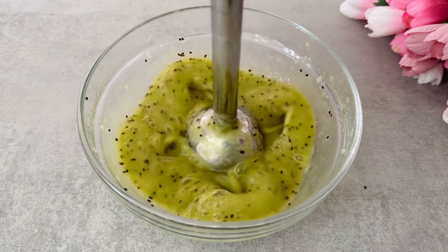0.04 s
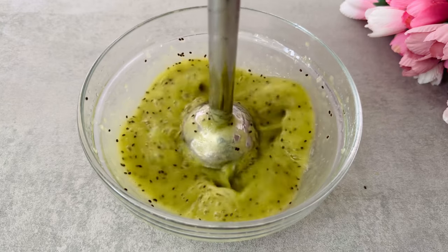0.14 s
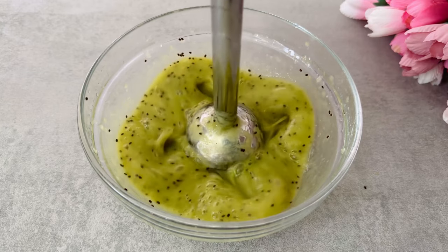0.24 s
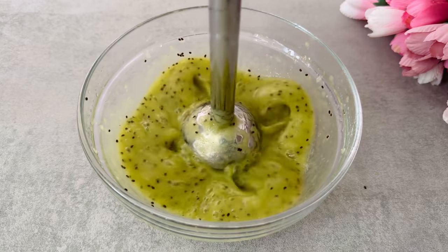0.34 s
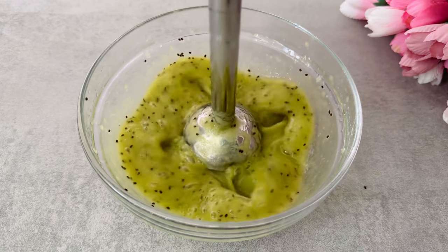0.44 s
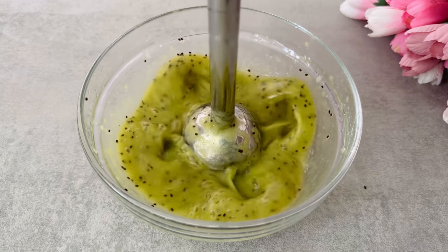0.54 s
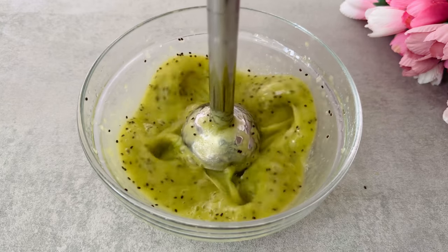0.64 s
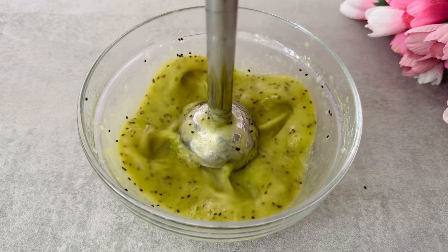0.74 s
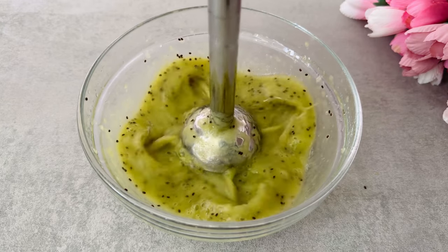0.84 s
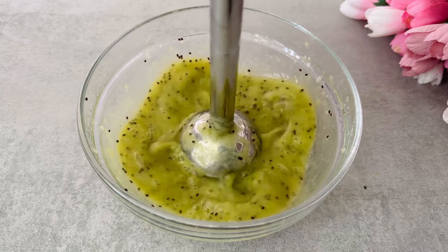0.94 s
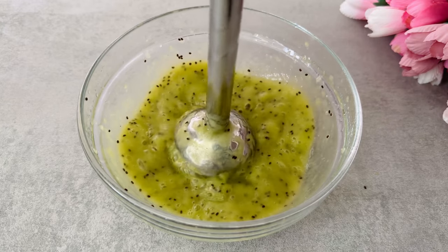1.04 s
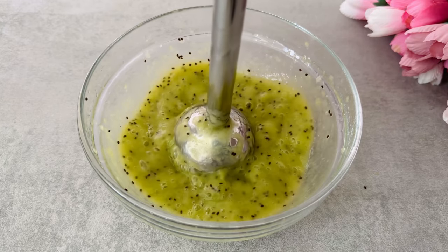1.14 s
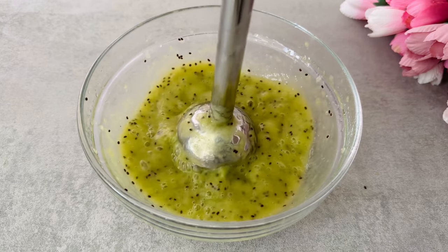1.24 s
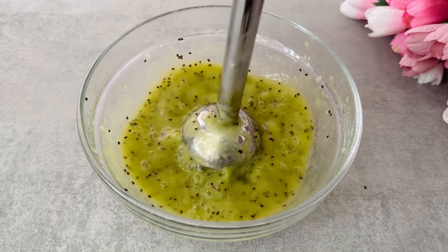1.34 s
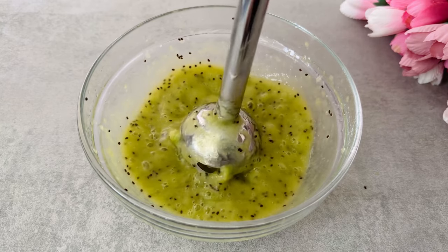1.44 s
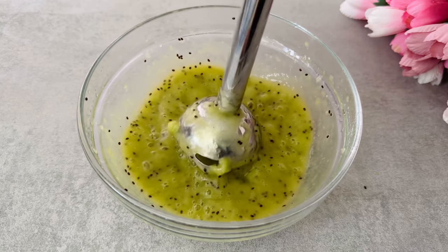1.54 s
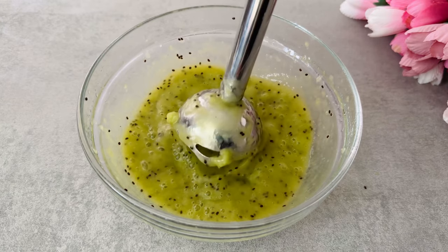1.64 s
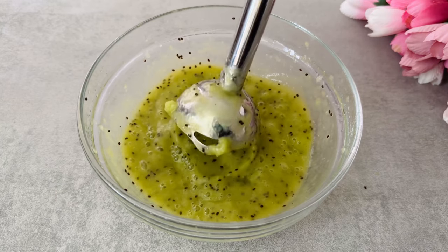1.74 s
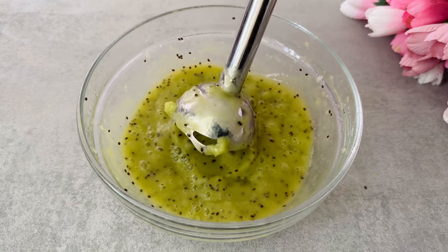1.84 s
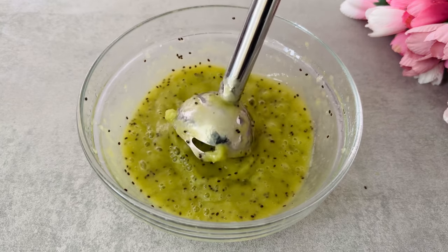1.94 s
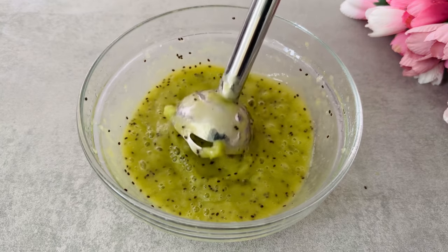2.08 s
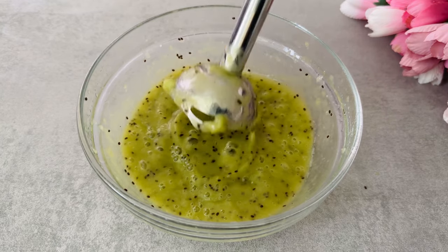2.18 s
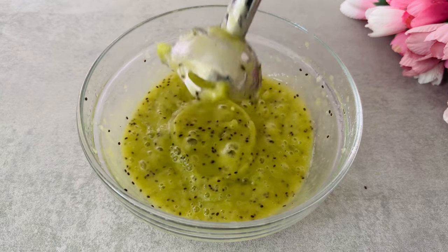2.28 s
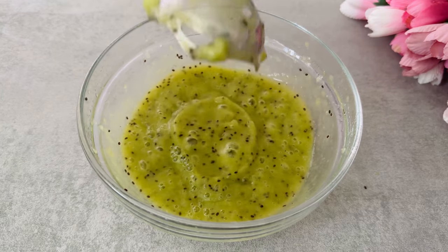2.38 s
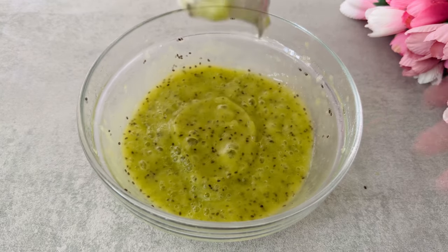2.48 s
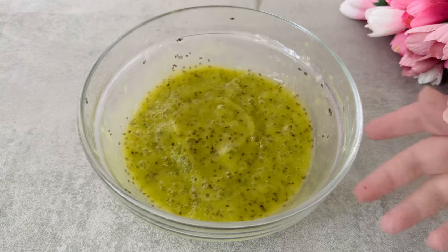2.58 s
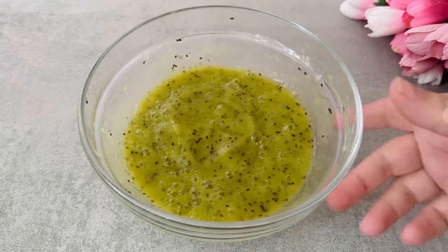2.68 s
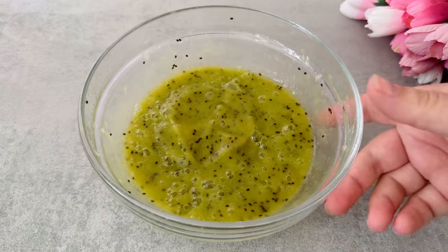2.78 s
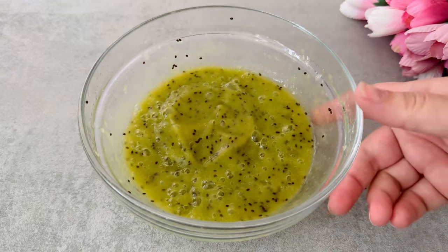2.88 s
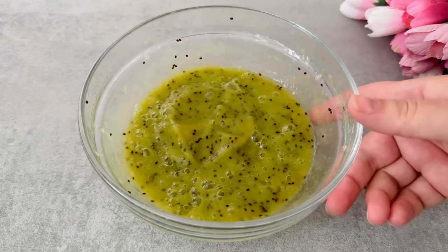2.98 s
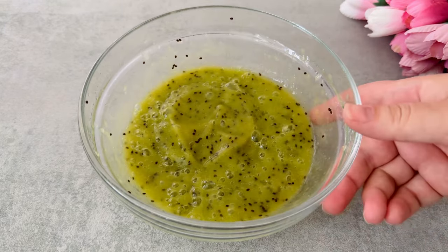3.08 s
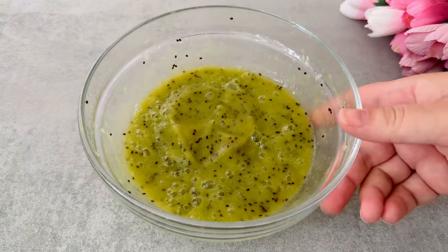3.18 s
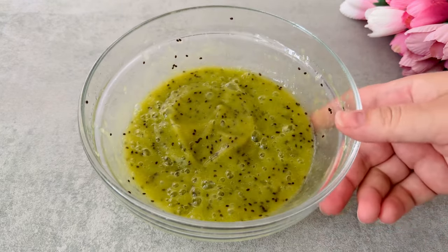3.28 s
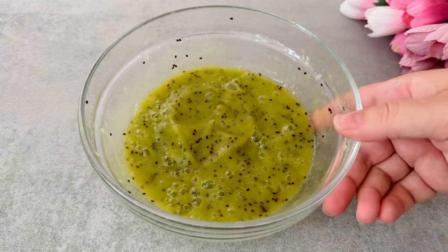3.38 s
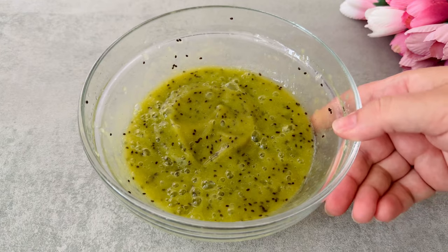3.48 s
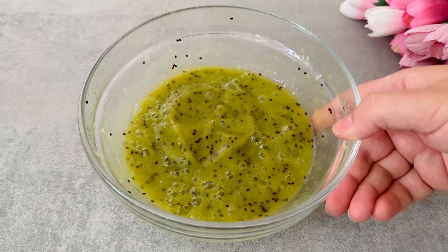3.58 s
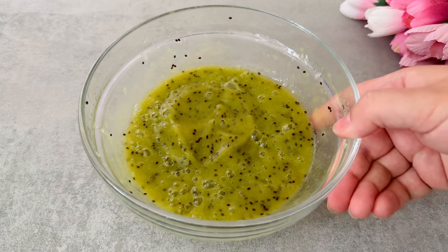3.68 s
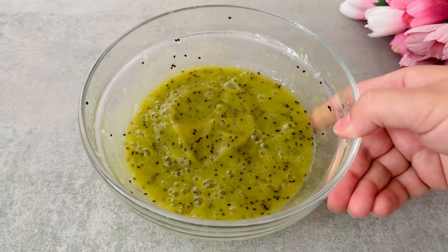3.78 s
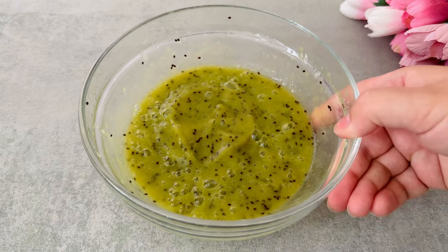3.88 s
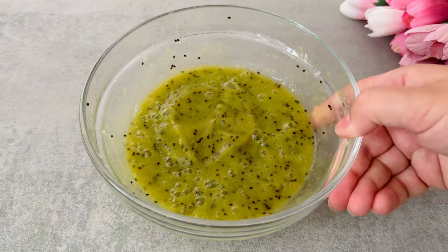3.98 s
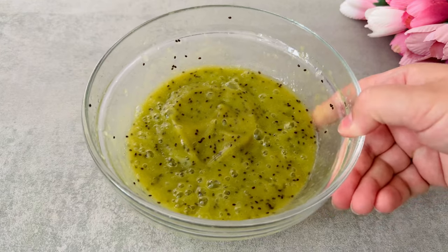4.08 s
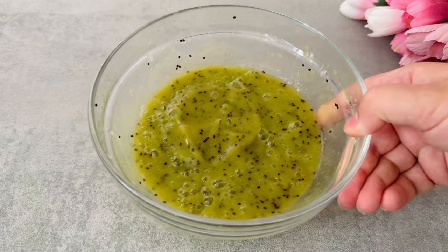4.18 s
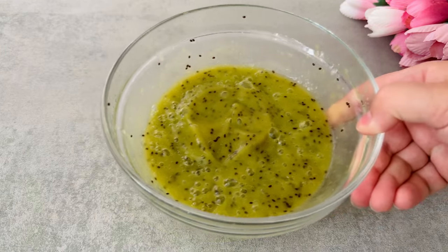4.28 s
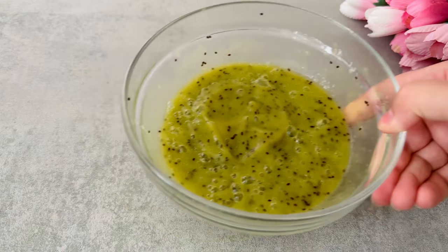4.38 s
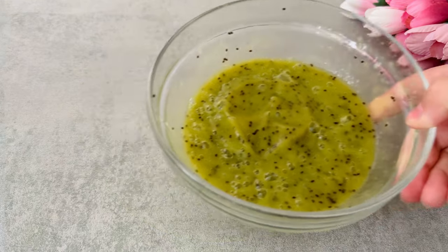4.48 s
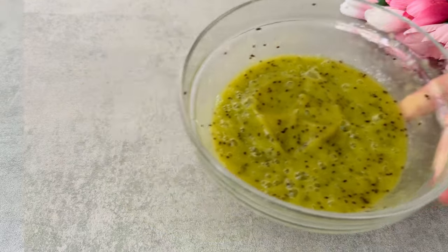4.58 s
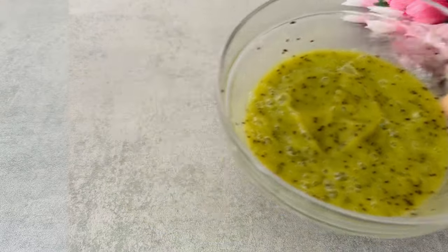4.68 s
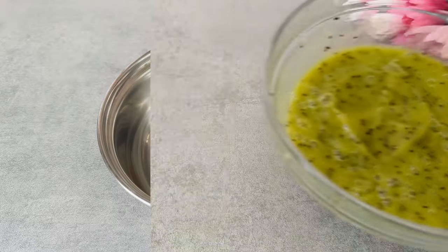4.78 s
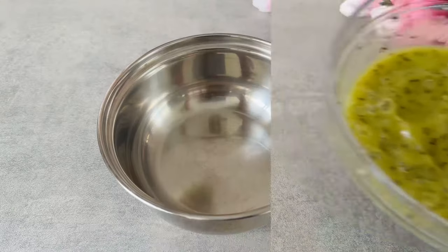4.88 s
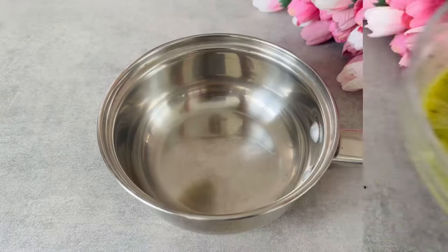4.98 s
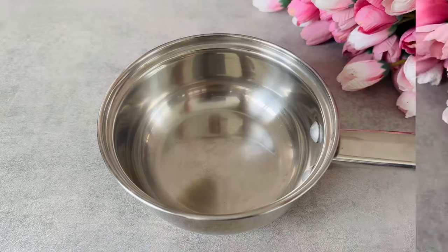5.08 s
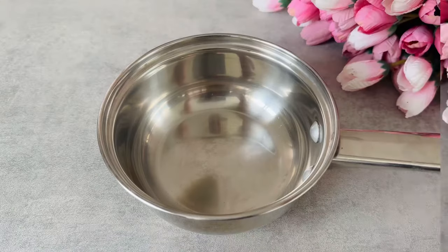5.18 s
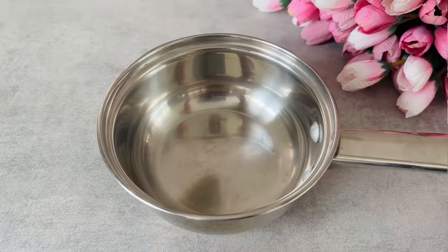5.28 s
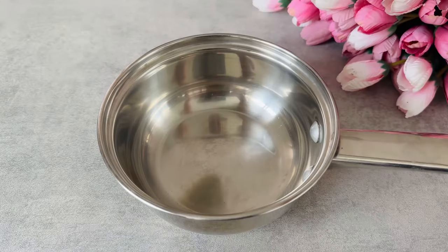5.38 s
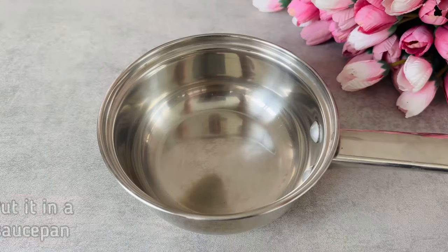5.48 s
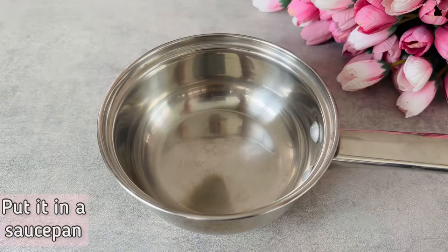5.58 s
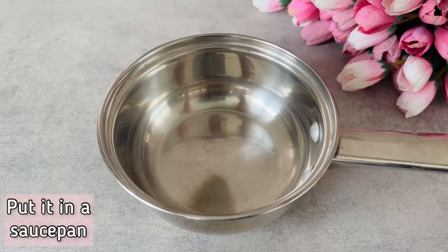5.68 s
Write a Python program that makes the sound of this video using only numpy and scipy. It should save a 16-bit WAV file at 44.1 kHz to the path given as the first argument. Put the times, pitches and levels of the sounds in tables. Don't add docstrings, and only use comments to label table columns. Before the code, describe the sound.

Close and central, a hand blender churns thick fruit pulp in a glass bowl with hollow gulps, wet spits and glassy spray. Just before one second its whine slides down and it stops. A much quieter, wide garden remains: far songbirds echoing, low wind, distant traffic, and a few tiny taps and ticks.

```python
import sys
import numpy as np
from scipy import signal
from scipy.fft import rfft, irfft, next_fast_len
from scipy.io import wavfile
from scipy.ndimage import uniform_filter1d, map_coordinates

SR = 44100
rng = np.random.default_rng(int(sys.argv[2]) if len(sys.argv) > 2 else 0)


def generate_wav(signal):
    frames = np.transpose(np.atleast_2d(signal))
    scaled = np.clip(frames, -1, 1) * 32767
    pcm = np.round(scaled).astype(np.int16)
    wavfile.write(sys.argv[1], SR, pcm)


def magnitude_from_level(level_db):
    exponent = np.asarray(level_db, float) / 20
    return 10 ** exponent


N = 252693
CLOCK = np.arange(N) / SR


def unit(x):
    return x / np.sqrt(np.mean(x ** 2) + 1e-20)


def along(points, hz):
    f, v = np.transpose(points)
    return np.interp(np.log(hz + 1), np.log(f + 1), v)


def curve(points):
    s, values = np.transpose(points)
    return np.interp(CLOCK, s, values)


def wobble(rate):
    knots = rng.standard_normal(int(N * rate / SR) + 4)
    return map_coordinates(knots, [np.arange(N) * rate / SR])


def hump(s, half_s):
    return np.exp(-((CLOCK - s) / half_s) ** 2)


def filtered(x, response):
    m = next_fast_len(N + 8192)
    return irfft(rfft(x, m) * response(np.fft.rfftfreq(m, 1 / SR)), m)[..., :N]


def resonances(rows, hz):
    return sum(magnitude_from_level(db) * w * w / ((hz - c) ** 2 + w * w) for c, w, db in rows)


def rush(spectrum, alike=((100, 1), (200, 1))):
    def shape(hz):
        turn = np.arccos(np.clip(along(alike, hz), -1, 1)) / 2
        return magnitude_from_level(along(spectrum, hz)) * [np.cos(turn), np.sin(turn)]

    mid, side = filtered(rng.standard_normal((2, N)), shape)
    return unit(np.array([mid + side, mid - side]))


def add(track, s, sound):
    part = track[..., round(s * SR):][..., :sound.shape[-1]]
    part += sound[..., :part.shape[-1]]


def aside(pair):
    return np.array([pair[0], np.roll(pair[1], shift=16)])


# (frequency [Hz], likeness [-1 to 1])
ALIKE = [(60, 0.97), (130, 0.81), (290, 0.92), (640, 0.25), (1410, 0.031), (3100, -0.0085), (6820, -0.22),
         (15000, 1)]
# (frequency [Hz], level [dB per Hz])
RUMBLE = [(2.4, -37), (4.0, 7.5), (16, 0), (25, -37), (30, -14), (38, -16.5), (60, -17), (110, -28.5),
          (140, -63.5), (240, -120)]
# (time [s], half length [s], rise [dB])
GUSTS = [
    (1.155, 0.16, 2.5),
    (1.99, 0.11, 15),
    (2.614, 0.42, 9),
    (3.826, 0.073, 8),
    (4.194, 0.075, 7.5),
    (4.9, 0.63, 2.5),
    (5.73, 0.73, 4.5),
]


def wind():
    gust_db = sum(db * hump(s, half_s) for s, half_s, db in GUSTS)
    low = magnitude_from_level(-58 + 0.17 * wobble(1.6)) * rush(RUMBLE, ALIKE)
    push = filtered(low, lambda hz: hz < 24)
    rest = low - push
    return magnitude_from_level(gust_db) * push + magnitude_from_level(.3 * gust_db + 1.0) * rest


# (frequency [Hz], level [dB per Hz])
TRAFFIC = [(35, -27.5), (60, -0.5), (253, -0.5), (412, -3), (541, -1), (633, -4.5), (701, -4.5),
           (900, -4.5), (1170, -40), (1980, -120)]
# (time [s], gain [dB])
APPROACH = [
    (1.15, 2.5),
    (2.2, 0.5),
    (2.6, 2),
    (4.4, 1.4),
    (5, 9.5),
    (5.73, 12),
]


def traffic():
    near_db = curve(APPROACH)
    drone = rush([(520, -60), (540, -6), (548, 0), (556, -6), (580, -60)], ALIKE)
    return magnitude_from_level(-74.5 + near_db) * (rush(TRAFFIC, ALIKE) + 0.12 * magnitude_from_level(near_db) * drone)


# (frequency [Hz], level [dB per Hz])
AIR = [(180, -49.5), (300, -19.5), (326, -21), (369, -6), (534, -3.5), (675, -3), (1000, -1.5),
       (1740, -7.5), (3190, -4.5), (5750, -11.5), (8000, -21), (10400, -48), (17600, -120)]


def distant_air():
    return magnitude_from_level(-63.5 + 0.16 * wobble(10.0)) * rush(AIR, ALIKE)


# (frequency [Hz], level [dB per Hz])
HISS = [(4710, -21.5), (8000, 2), (10900, -5.5), (14200, -6), (15200, -10)]


def thin_hiss():
    jump_s, rise_s, fade_s = 4.73, 0.013, 3
    since = np.maximum(CLOCK - jump_s, 0)
    jump = (1 - np.exp(-since / rise_s)) * np.exp(-since / fade_s)
    hiss_db = -4.5 * hump(1.98, 0.66) + 8.5 * jump
    return magnitude_from_level(-82.5 + hiss_db + 1.5 * wobble(27)) * rush(HISS, ALIKE)


def garden():
    return wind() + aside(traffic() + distant_air()) + thin_hiss()


# (frequency [Hz], time to fade 60 dB [s])
TREES = [(2000, 0.77), (5000, 1.55), (9000, 0.6)]


def trees(x):
    hz, t, z = signal.stft(rng.standard_normal((2, SR * 3 // 4)), SR, nperseg=256)
    fade = magnitude_from_level(-60 * t / along(TREES, hz)[:, None])
    tail = signal.istft(z * fade, SR, nperseg=256)[1]
    return signal.fftconvolve(x[None], tail / np.linalg.norm(tail[0]), axes=1)


def whistle(hz, db):
    quaver_hz = 65.3 * np.sin(2 * np.pi * (130 * np.arange(len(hz)) / SR + rng.random()))
    ends = signal.windows.tukey(len(hz), .5)
    return magnitude_from_level(db) * ends * np.sin(2 * np.pi * np.cumsum(hz + quaver_hz) / SR)


# (time [s], length [s], from [Hz], to [Hz], level [dB])
PHRASE = [
    (2.434, 0.026, 7900, 7830, -59),
    (2.469, 0.057, 7960, 7760, -77),
    (2.475, 0.03, 6800, 4410, -57),
    (2.499, 0.045, 4410, 4283, -59),
    (2.6, 0.036, 4030, 3774, -54.5),
    (2.644, 0.019, 3770, 3140, -57),
    (2.78, 0.042, 3195, 3117, -62.5),
    (2.88, 0.089, 3120, 3140, -71),
]
# (time [s], length [s], from [Hz], to [Hz], level [dB])
PHRASE_FACING = [
    (2.557, 0.069, 4470, 4430, -62.5),
    (2.615, 0.027, 5230, 5030, -63),
    (2.696, 0.0482, 3600, 3100, -57.5),
]
# (time [s], length [s], from [Hz], to [Hz], level [dB])
SONG = [(4.421, 0.015, 4040, 7600, -64), (4.446, 0.035, 7230, 6850, -62), (4.492, 0.014, 6720, 6530, -66.5),
        (4.583, 0.029, 7400, 6780, -59), (4.594, 0.024, 7180, 5480, -59.5), (4.724, 0.026, 3730, 3720, -72),
        (4.732, 0.0096, 3120, 3000, -68.5), (4.769, 0.012, 7080, 6770, -53),
        (4.862, 0.075, 7410, 8070, -61), (4.897, 0.046, 7760, 8780, -60), (5.096, 0.034, 6120, 5990, -55.5)]
# (time [s], length [s], from [Hz], to [Hz], level [dB])
SONG_FACING = [
    (4.448, 0.014, 6500, 3590, -79),
    (4.775, 0.024, 6930, 5390, -56.5),
    (5.096, 0.016, 4550, 6340, -51),
    (5.137, 0.04, 5950, 3730, -53),
    (5.22, 0.018, 3370, 3340, -62.5),
]
# (time [s], chip pitch [Hz], chip level [dB])
CHIPS = [
    (5.271, 5800, -58),
    (5.322, 5990, -51),
    (5.382, 5160, -54.5),
    (5.452, 5280, -51.5),
    (5.51, 5160, -56),
    (5.572, 4890, -52),
    (5.647, 4650, -54),
    (5.718, 4500, -60),
]
# (time [s], length [s], pitch [Hz], level [dB], left over right [dB])
CALLING = [(1.135, 0.034, 5380, -68.5, 1), (1.193, 0.022, 3484, -65.5, -3), (1.41, 0.1, 7320, -80, 7),
           (1.427, 0.029, 2690, -67, 4), (1.463, 0.066, 2940, -66, -2), (1.597, 0.1, 2950, -84.5, -2.5),
           (1.73, 0.099, 6200, -82, 8), (1.84, 0.0387, 5624, -71, 1.5), (1.851, 0.026, 4150, -72, 3),
           (1.872, 0.013, 3470, -79, -1), (1.973, 0.029, 8400, -74, -4), (2.023, 0.022, 5730, -66, -1),
           (2.136, 0.0099, 3640, -68, 2), (2.215, 0.031, 4010, -66, 5)]
# (time [s], length [s], pitch [Hz], level [dB])
ANSWERS = [(3.295, 0.01, 5430, -65), (3.88, 0.029, 3250, -73), (3.325, 0.01, 5480, -66),
           (3.64, 0.064, 6200, -75), (3.668, 0.011, 5330, -72), (3.689, 0.046, 4560, -70),
           (3.95, 0.048, 7740, -79), (3.959, 0.011, 4400, -78), (4.054, 0.043, 5340, -74),
           (4.16, .016, 4800, -71), (4.207, 0.014, 3970, -67), (4.333, 0.064, 3430, -74),
           (5.047, 0.011, 4060, -60.5)]
# (time [s], length [s], from [Hz], to [Hz], level [dB])
CLOSE = [
    (1.78, .02, 3100, 2500, -71),
    (1.96, 0.036, 2900, 2300, -70),
    (2.937, .012, 5800, 5300, -64),
    (2.947, 0.033, 5300, 5150, -63),
    (3.31, 0.075, 4000, 3800, -63),
    (3.58, 0.053, 3200, 3060, -65),
    (3.83, .07, 2300, 3280, -71),
    (4.12, 0.073, 3000, 2790, -69),
    (4.17, 0.051, 2900, 2650, -60),
]


def glides():
    def call(s, length, hz, db):
        return s, length, hz, hz * (1 - 0.00177 / length), db

    notes = [(*row, -9, 2) for row in CLOSE]
    notes += [(*row, -.5, -2.5) for row in PHRASE_FACING]
    notes += [(*row, -.5, 3) for row in SONG_FACING]
    notes += [(*row, 2.3, -2.5) for row in PHRASE]
    notes += [(*row, 6, 3) for row in SONG]
    notes += [(s, .015, hz, hz * (1 - .05), db, -9, 4) for s, hz, db in CHIPS]
    notes += [(s + .014, .012, 3800, 3800 * (1 - .04), -57.5, -9, 4) for s, _, _ in CHIPS[:-1]]
    notes += [(*call(*row), 2.5, pan_db) for *row, pan_db in CALLING]
    notes += [(*call(*row), -1.6, 7) for row in ANSWERS]
    return notes


# (time [s], length [s], top [Hz], bottom [Hz], level [dB])
TRILLS = [
    (1.231, 0.074, 4350, 3790, -52.5),
    (1.245, 0.045, 4750, 4400, -65),
    (1.335, .04, 4800, 4450, -66),
    (1.358, 0.024, 4110, 3970, -55.5),
    (1.398, 0.023, 4530, 3840, -70),
    (2.002, 0.08, 8260, 6920, -63),
    (2.134, 0.064, 8060, 7510, -59),
    (2.274, 0.091, 7980, 7170, -60.5),
]


def birds():
    out = np.zeros((2, N))

    def seat(pan_db):
        return magnitude_from_level([[pan_db / 2], [-pan_db / 2]])

    for s, length, from_hz, to_hz, db, echo_db, pan_db in glides():
        note = whistle(np.geomspace(from_hz, to_hz, round(length * SR)), db)
        add(out, s, seat(pan_db) * magnitude_from_level(-0.5) * note)
        add(out, s + 0.0071, seat(pan_db) * magnitude_from_level(4.5 + echo_db) * trees(note))
    for s, length, top_hz, bottom_hz, db in TRILLS:
        rate, pan_db = (45, -3) if top_hz < 6000 else (33, -0.69)
        stroke = np.arange(round(length * SR)) / SR * rate % 1
        path_hz = bottom_hz + (top_hz - bottom_hz) * (1 - stroke) ** 1.554
        note = whistle(path_hz, db) * np.sin(np.pi * stroke) ** .5
        add(out, s, seat(pan_db) * magnitude_from_level(0.5) * note)
        add(out, s + 0.000996, seat(pan_db) * magnitude_from_level(6.5) * trees(note))
    return out


def thinned(x, near_db, above_db):
    z = signal.stft(x, nperseg=1024)[2]
    band = uniform_filter1d(np.abs(z) ** 2, size=5, axis=1)[:, 2::5].mean(0)
    band = uniform_filter1d(band, size=2, axis=1)
    band[:8] = 0
    near = magnitude_from_level(2 * near_db) * uniform_filter1d(band, size=7, axis=0)
    above = magnitude_from_level(2 * above_db) * signal.lfilter([1], [1, -.8], band, axis=0)
    least = magnitude_from_level(2 * (-117 + 1.3 * (np.arange(len(band)) - 67)))[:, None]
    flicker = magnitude_from_level(6 * unit(uniform_filter1d(rng.standard_normal(band.shape), size=5, axis=1)))
    keep = band >= (near + above + least) * flicker
    keep[:12] = True
    return signal.istft(z * np.repeat(keep, 5, axis=0)[:z.shape[1]], nperseg=1024)[1][:, :N]


# (time [s], peak [dB], body [dB])
TICKS = [(1.4053, -68, 6), (1.8724, -75.5, 32), (3.5084, -69, -1), (3.5197, -59, 1), (4.1897, -61, 13),
         (4.2268, -61, 10), (4.734, -55, 2), (4.745, -49, -3), (4.7497, -49.5, 0), (4.762, -56, -4),
         (4.8083, -52, 5), (5.6987, -52.5, 1)]
# (time [s], pitch [Hz], level [dB], time to fade 60 dB [s])
PLINKS = [
    (2.09, 419, -53.5, 0.12),
    (2.529, 1980, -50, 0.027),
    (2.55, 640, -56.5, 0.1),
    (3.62, 537, -53, 0.073),
    (4.711, 1120, -47, 0.039),
    (4.885, 2080, -51.5, 0.032),
]


def ticks():
    out, t = np.zeros(N), np.arange(SR // 5) / SR
    for s, db, body_db in TICKS:
        fade = magnitude_from_level(db - 7.5 - 60 * t / 0.089) * (1 - np.exp(-t / 0.0021))
        puff = uniform_filter1d(rng.standard_normal(len(t)), size=2) * fade
        body = uniform_filter1d(puff, size=6)
        edge = puff - body
        add(out, s - .002, edge + magnitude_from_level(body_db + 5.0) * uniform_filter1d(body, size=4))
    for s, hz, db, t60 in PLINKS:
        add(out, s, magnitude_from_level(db - 60 * t / t60) * np.sin(2 * np.pi * hz * t) * (1 - np.exp(-t / 0.0042)))
    return out


# (frequency [Hz], width [Hz], level [dB])
HOUSING = [(4500, 300, 13), (5600, 250, 11), (7400, 300, 12), (8800, 350, 12), (11100, 450, 8),
           (12800, 400, 5), (14500, 500, 8)]


def whine():
    off_s, drag_per_s = .765, 5.2
    bar_hz = 3620 * np.exp(-drag_per_s * np.maximum(CLOCK - off_s, 0))
    db = -69 + np.interp(CLOCK, [.74, .82], [3, 0]) - 450 * np.clip(CLOCK - .84, 0, 1) ** 2
    blur = np.interp(CLOCK, [.74, .8], [.016, .004])
    phase = 2 * np.pi * np.cumsum(bar_hz * (1 + blur * wobble(900))) / SR
    comb = np.zeros(N)
    for k in range(2, 17):
        comb += magnitude_from_level(-.9 * k + 2 * wobble(70)) * np.sin(k * phase) * (k * bar_hz < 16000)
    return filtered(magnitude_from_level(db) * comb, lambda hz: .25 + resonances(HOUSING, hz))


# (centre time [s], pitch [Hz], level [dB], length [s])
GULPS = [(0.019, 810, -31.5, 0.019), (0.039, 316, -27.5, 0.018), (0.094, 773, -30.5, 0.034),
         (0.115, 682, -27, 0.022), (0.136, 704, -33, 0.031), (0.137, 632, -32.5, 0.031),
         (0.163, 683, -23, 0.016), (0.18, 680, -26.5, 0.017), (0.188, 817, -25.5, 0.014),
         (0.208, 715, -27, 0.032), (0.229, 680, -30, 0.026), (0.255, 704, -33, 0.024),
         (0.271, 787, -21, 0.018), (0.291, 300, -31, 0.019), (0.292, 867, -26, 0.023),
         (0.308, 697, -23.5, 0.024), (0.334, 755, -28.5, 0.024), (0.355, 801, -24, 0.021),
         (0.378, 700, -43.5, 0.016), (0.394, 740, -22, 0.016), (0.418, 960, -27, 0.024),
         (0.443, 1044, -32.5, 0.024), (0.452, 747, -26.5, 0.016), (0.463, 1023, -29.5, 0.042),
         (0.464, 1096, -32, 0.056), (0.469, 705, -26, 0.02), (0.472, 256, -35.5, 0.058),
         (0.476, 988, -29, 0.017), (0.477, 1482, -25.5, 0.018), (0.482, 650, -25.5, 0.021),
         (0.485, 378, -29.5, 0.021), (0.507, 1028, -30, 0.024), (0.526, 718, -30.5, 0.034),
         (0.542, 740, -32, 0.024), (0.559, 857, -28, 0.024), (0.563, 664, -26.5, 0.018),
         (0.582, 780, -24.5, 0.027), (0.614, 647, -25, 0.017), (0.618, 810, -25.5, 0.016),
         (0.632, 780, -27.5, 0.022), (0.684, 744, -26.5, 0.032), (0.739, 796, -30, 0.032),
         (0.772, 750, -28.5, 0.017), (0.803, 805, -36, 0.03), (0.804, 1050, -32, 0.026),
         (0.83, 708, -33.5, 0.038), (0.833, 371, -35.5, 0.027), (0.863, 780, -37.5, 0.023),
         (0.891, 690, -43, 0.024), (0.901, 755, -35, 0.022)]


def gulps():
    out = np.zeros(N)
    for s, hz, db, length in GULPS:
        u = np.linspace(0, 1, round(length * SR))
        turn = 2 * np.pi * (hz * length * (u + 0.023 * (u * u - u)) + rng.random())
        swell = np.sin(np.pi * u ** 0.84) ** 1.75
        add(out, max(s - length / 2, 0), magnitude_from_level(db + 1.0) * swell * np.sin(turn))
    return out


# (time [s], peak [dB], cavity pitch [Hz], fine spray [dB])
SPLATS = [(0.0147, -22, 4030, 0.5), (0.0316, -24, 6860, -0.5), (0.0406, -28.5, 4310, -1),
          (0.0778, -30, 4960, -1.5), (0.1042, -32, 6670, -13), (0.1142, -25, 5360, -2),
          (0.1286, -28, 4440, 14), (0.1373, -31, 3300, 9), (0.183, -41, 5180, 9), (0.2078, -19.5, 6790, -9),
          (0.2262, -19.5, 3200, 3.5), (0.2666, -18.5, 4840, 1), (0.2852, -32, 3940, 8.5),
          (0.345, -29, 3300, 6.5), (0.3917, -25.5, 4050, 7.5), (0.413, -14, 5900, -10.5),
          (0.437, -19.5, 3300, 8), (0.4549, -22, 4930, 2), (0.4638, -20, 3270, 1),
          (0.4815, -17.5, 6780, -3), (0.4924, -25.5, 2520, 2.5), (0.5042, -19.5, 7500, -9.5),
          (0.5219, -17.5, 6370, -1.5), (0.5543, -26.5, 6020, 0.5), (0.5607, -24, 6960, 2.5),
          (0.5774, -32.5, 3270, 0), (0.612, -18.5, 6000, 3), (0.6526, -34, 7410, 7),
          (0.6706, -26, 6140, 2.5), (0.6784, -21, 6700, -6), (0.687, -25.5, 6740, -3.5),
          (0.6954, -18.5, 4240, -1), (0.7136, -31, 7270, -3.5), (0.753, -31.5, 8800, -6),
          (0.7703, -31, 3350, 8), (0.7921, -28.5, 3080, 3), (0.8004, -26.5, 5800, -2.5),
          (0.8294, -34, 3230, 5), (0.857, -36, 4240, -16), (0.893, -46, 3680, -8), (0.9194, -42, 4360, -14)]


def splats():
    bursts, t = np.zeros(N), np.arange(SR // 40) / SR
    swell = (t / .0022 * np.exp(1 - t / 0.0017)) ** 1.8
    late_swell = np.roll(swell, shift=110)
    for s, db, cavity_hz, fine_db in SPLATS:
        crisp_db = fine_db + 9 + 5.5 * np.log2(cavity_hz / 5000)
        spit = rng.standard_normal((3, len(t)))
        cavity = signal.lfilter(*signal.iirpeak(cavity_hz, 6, SR), spit[0])
        dull = uniform_filter1d(spit[1], size=3)
        crisp = uniform_filter1d(spit[2], size=2) - uniform_filter1d(spit[2], size=5)
        tiny_hz = 8000 + 6500 * rng.random()
        tiny = unit(signal.lfilter(*signal.iirpeak(tiny_hz, 5, SR), spit[2]))
        crisp = 0.97 * crisp + 0.54 * np.std(crisp) * tiny
        burst = swell * (dull + 0.98 * unit(cavity)) + magnitude_from_level(crisp_db) * late_swell * crisp
        add(bursts, s - .001, magnitude_from_level(db - 9.5) * burst)
    return bursts


# (frequency [Hz], level [dB per Hz])
BOWL = [(110, -66), (190, -17.5), (247, -2), (314, -5.5), (509, -9), (662, -3.5), (771, -4.5), (889, -5.5),
        (1030, -4.5), (1260, -11), (1540, -9.5), (2180, -25), (2600, -29), (3380, -31), (5720, -120)]
# (time [s], pitch [Hz])
BELL = [
    (0, 770),
    (.1, 730),
    (.18, 680),
    (.27, 790),
    (.4, 770),
    (.6, 790),
    (.76, 795),
    (1.05, 720),
]


def slosh(lumps):
    flutter = uniform_filter1d(rng.standard_normal((2, N)), size=280)
    flutter = uniform_filter1d(flutter, size=280)
    turn = 2 * np.pi * np.cumsum(curve(BELL)) / SR
    pocket = unit(flutter[0] * np.cos(turn) + flutter[1] * np.sin(turn))
    return unit(magnitude_from_level(2.95 * np.tanh(lumps / 3)) * (rush(BOWL)[0] + .45 * pocket))


# (time [s], churn level [dB])
LOAD = [
    (0, -26),
    (.3, -25.5),
    (.33, -27.5),
    (.46, -23),
    (.62, -26.5),
    (.645, -29.5),
    (.69, -23.5),
    (.72, -27.5),
    (.8, -29.5),
]
# (frequency [Hz], level [dB per Hz])
HUM = [(32, -32.5), (55, -8.5), (86, 5.5), (151, 2), (173, -7), (200, -4.5), (260, -29.5), (440, -120)]
# (frequency [Hz], level [dB per Hz])
SPRAY = [(1060, -17), (1800, -1.5), (2470, -5), (2940, -9), (3280, -2), (3620, -7), (6910, -4.5),
         (8590, -10), (14400, -19.5), (15800, -22)]
# (frequency [Hz], width [Hz], level [dB])
GLASS = [(1965, 51, 3), (2470, 53, 9.5), (3290, 78, -4), (4080, 430, -0.5), (4930, 280, -1.5),
         (5480, 82, -8), (6700, 56, -6.5), (6790, 250, -20.5), (9450, 200, -10)]


def blender():
    load_db = curve(LOAD)
    extra_db = load_db + 27
    rest = np.clip(CLOCK - 0.81, 0, 1)
    settle_db = -18 * rest - 360 * rest ** 2
    hum_db = -50 + 0.19 * extra_db - 2.5 * CLOCK + settle_db
    spray_db = -42.5 + 1.6 * extra_db - 16 * rest + 0.97 * settle_db
    stirring = np.interp(CLOCK, [.8, .9], [1, .2])
    lumps = stirring * (4.0 * wobble(89.76) + 0.33 * wobble(26.7))

    churn = magnitude_from_level(load_db + settle_db - 4.5) * slosh(lumps)
    hum = magnitude_from_level(hum_db) * rush(HUM)[0]
    mist = magnitude_from_level(spray_db + 0.3 * lumps + 2 * stirring * wobble(250)) * rng.standard_normal(N)

    def colour(hz):
        glass = 1 + magnitude_from_level(-4.0) * resonances(GLASS, hz)
        return magnitude_from_level(along(SPRAY, hz) + 5.5) * glass

    return (churn + hum + filtered(mist + splats(), colour)) * (CLOCK < 1.12)


def scene():
    background = thinned(birds() + garden(), near_db=-9.5, above_db=-25)
    return background + ticks() + whine() + gulps() + blender()


def top_cut(x):
    return signal.sosfilt(signal.butter(12, 15940, fs=SR, output="sos"), x)


def record(dry):
    headroom = .3
    soft = dry / (1 + (dry / headroom) ** 4) ** (1 / 4)
    return top_cut(soft)


dry = scene()
out = record(dry)
generate_wav(out)
```